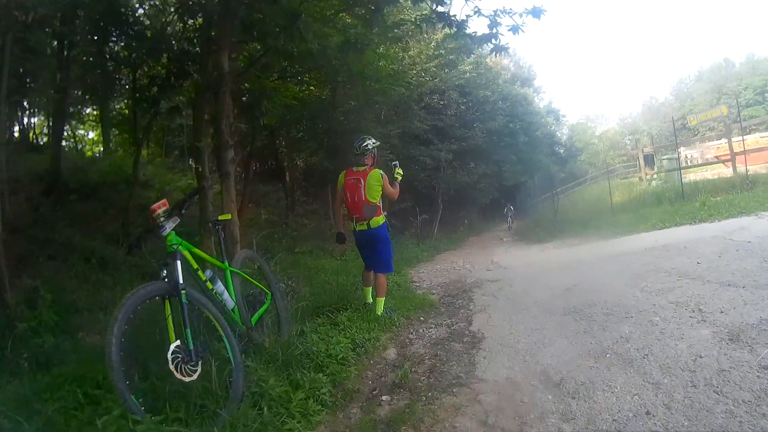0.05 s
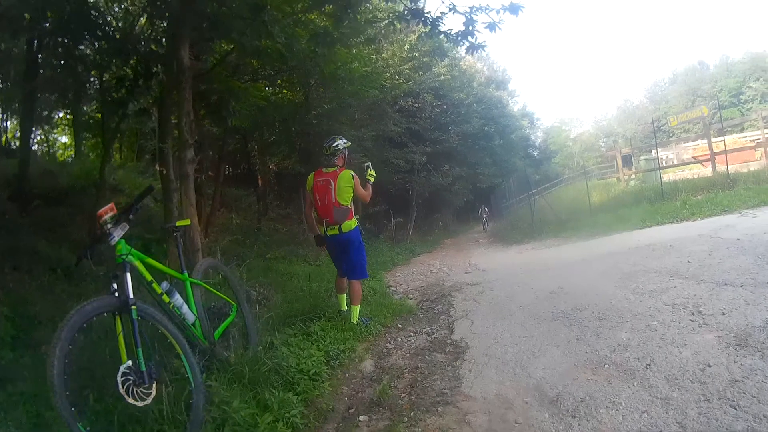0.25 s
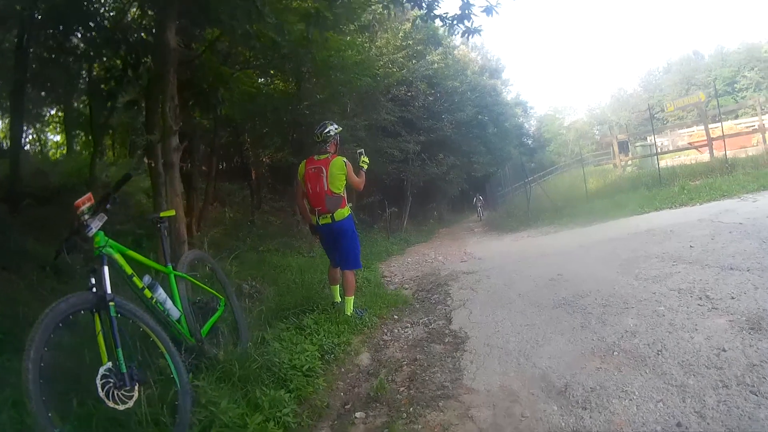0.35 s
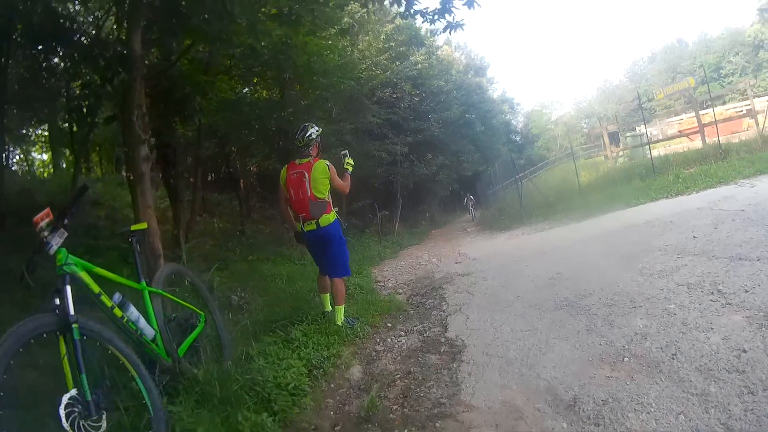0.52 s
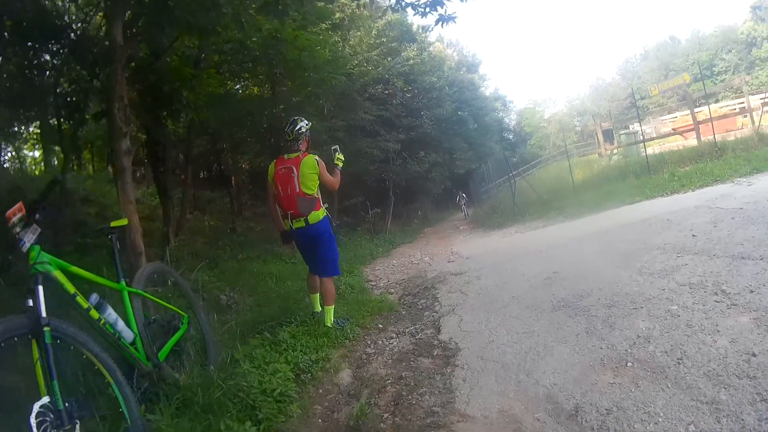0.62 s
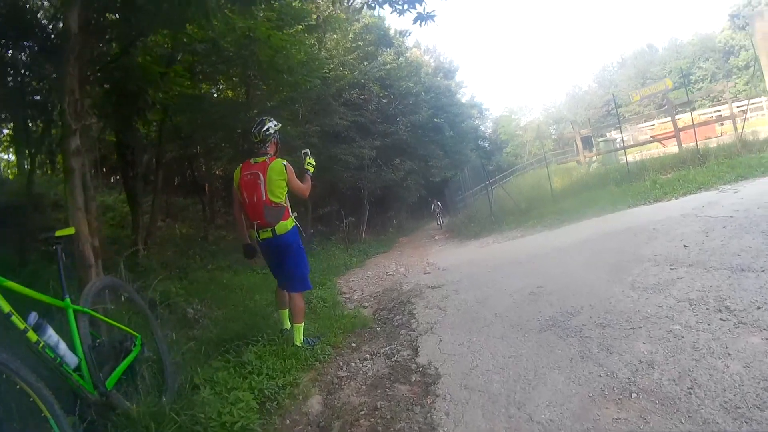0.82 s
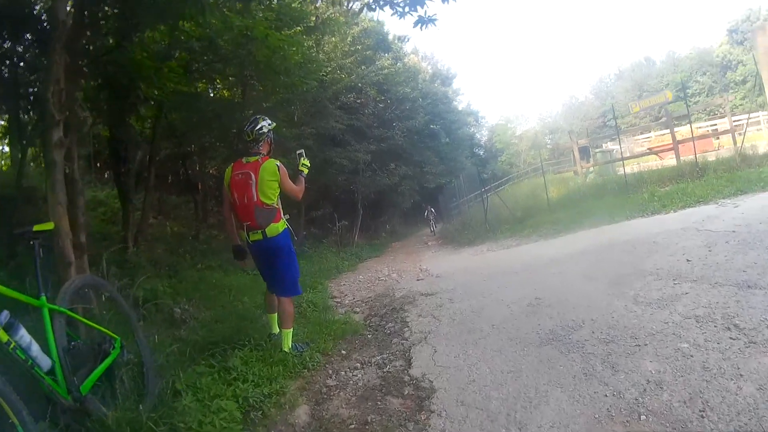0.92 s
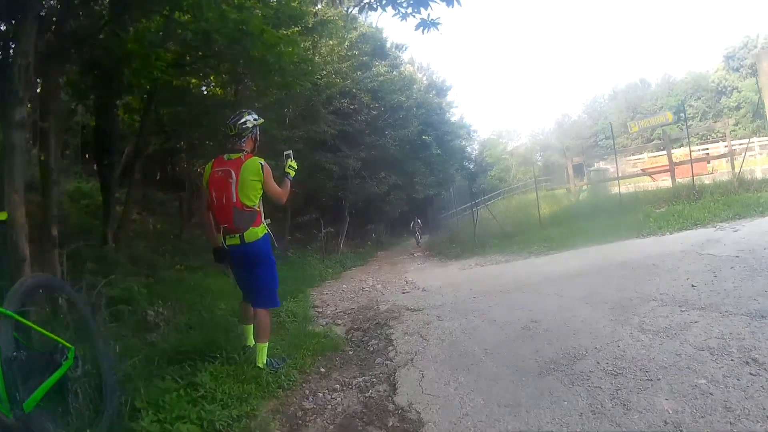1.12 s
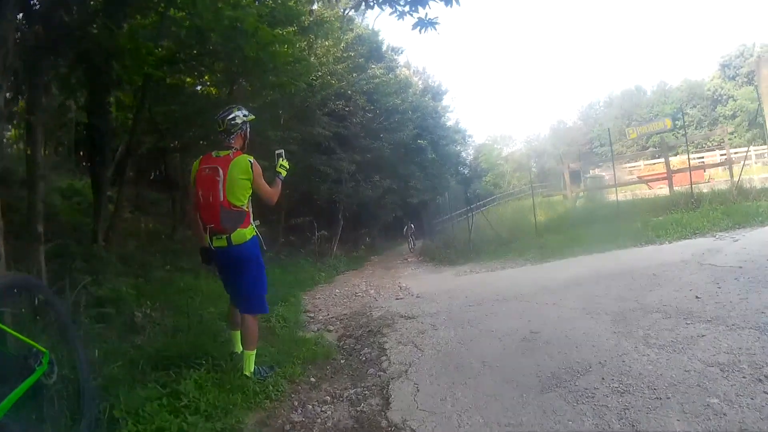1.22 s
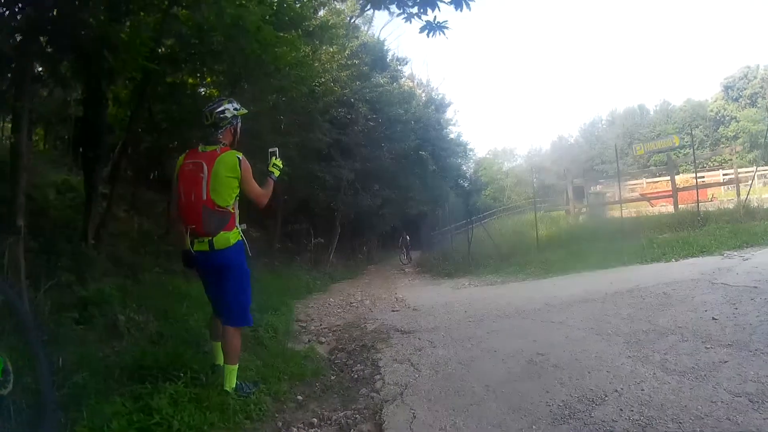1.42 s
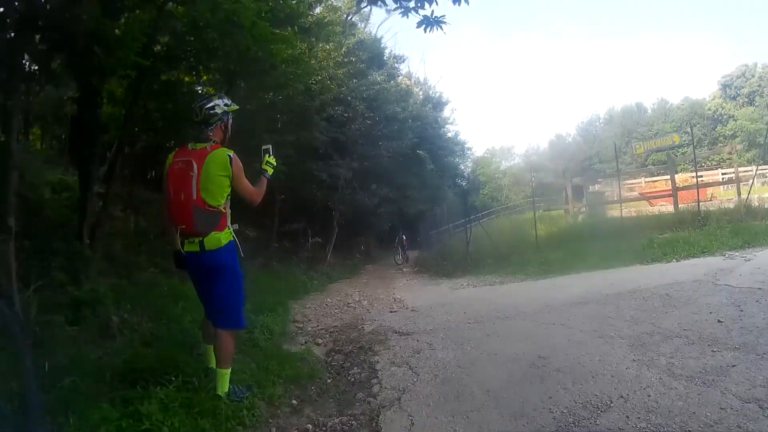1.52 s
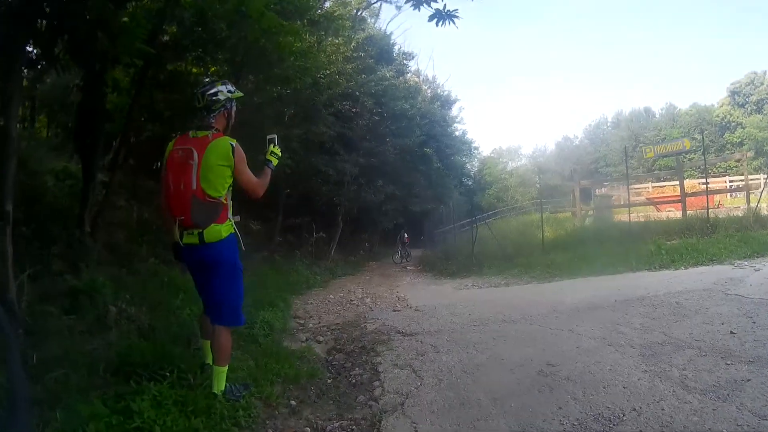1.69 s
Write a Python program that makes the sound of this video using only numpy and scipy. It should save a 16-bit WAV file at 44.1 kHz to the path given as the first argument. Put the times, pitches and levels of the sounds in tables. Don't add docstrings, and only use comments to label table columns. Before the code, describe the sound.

Close, rough bike-mounted sound of tyres on a gravel track: a dense flurry of jolts and stone cracks, ringing hits on the frame tube, then sparser grit snaps, one last thud cluster and faint hiss.

```python
import sys
import numpy as np
from scipy import signal
from scipy.fft import rfft, irfft
from scipy.io import wavfile
from scipy.ndimage import uniform_filter1d

SR = 44100
rng = np.random.default_rng(int(sys.argv[2]) if len(sys.argv) > 2 else 0)


def natural_amplitude(level_db):
    exponent = np.asarray(level_db, float) / 20
    return 10 ** exponent


def pcm_store(signal):
    levels = np.round(np.clip(np.atleast_2d(signal), -1, 1) * 32767)
    wavfile.write(sys.argv[1], SR, levels.astype(np.int16).T)


N = 77175


def read(points, hz):
    f, value = np.transpose(points)
    return np.interp(np.log(hz + 1), np.log(f + 1), value)


def curve(points):
    s, level_db = np.transpose(points)
    return natural_amplitude(np.interp(np.arange(N) / SR, s, level_db))


def evened(x):
    return x / np.sqrt(np.mean(x ** 2) + 1e-20)


def slow_noise(shape, size):
    noise = rng.standard_normal(shape)
    return evened(uniform_filter1d(uniform_filter1d(noise, size=size), size=size))


def add(mix, s, sound):
    part = mix[max(round(s * SR), 0):][:len(sound)]
    part += sound[:len(part)]


def resonate(x, hz, width):
    r, c = np.exp(-np.pi * width / SR), np.cos(2 * np.pi * hz / SR)
    return signal.lfilter([2 * (1 - r), -2 * (1 - r) * r * c], [1, -2 * r * c, r * r], x)


def body(x, table):
    total = 0
    for k, (hz, width, level_db) in enumerate(table):
        sign = (-1) ** k
        total = total + sign * natural_amplitude(level_db) * resonate(resonate(x, hz, 2 * width), hz, width)
    return total


# start_s [s], level_db [dB], pitch_hz [Hz], rattle_db [dB]
KNOCKS = [(0.0082, -44, 477, 13), (0.0694, -31, 250, -4), (0.1474, -14.5, 237, -4), (0.2073, -2.5, 620, -2),
          (0.2202, -18.5, 243, 0), (0.2283, 3.5, 570, -4.5), (0.2523, -8.5, 464, 0), (0.291, -16, 218, -6),
          (0.3028, -13, 400, -7), (0.3183, 3, 560, -5), (0.3522, 3.5, 550, -2.5), (0.3756, 0.5, 472, -12.5),
          (0.4092, -11, 570, 6.5), (0.43, -5, 510, -0.5), (0.447, -9.5, 223, -4.5),
          (0.4948, -17.5, 209, -8), (0.5464, -9.5, 520, 5.5), (0.553, -18, 187, -10),
          (0.587, -14.5, 225, -14), (0.7611, -19, 208, -18), (0.813, -23, 132, -7),
          (0.8556, -20.5, 194, -22), (1.0236, -12.5, 520, -10.5), (1.296, -31, 245, -2),
          (1.372, -4, 263, -9.5), (1.4057, -13, 490, -4.5), (1.4165, -7, 268, -15),
          (1.6635, -24.5, 483, -6), (1.6753, -37, 485, -3.5)]
# pitch_hz [Hz], width_hz [Hz], level_db [dB]
RATTLE = [(135, 106, 4), (520, 208, 5.5), (814, 310, -11.5), (1595, 780, -7.5)]


def knocks():
    t, mix, shake = np.arange(4000) / SR, np.zeros(N), np.zeros(N)
    noise = rng.standard_normal((len(KNOCKS), 4000))
    thump = natural_amplitude(-23.5) * np.sin(2 * np.pi * 91.2 * t) * np.exp(-t / 0.02)
    for (start_s, level_db, pitch_hz, rattle_db), rough in zip(KNOCKS, noise):
        cycles = t * pitch_hz
        rise = np.minimum(cycles / 0.623, 1) ** 3.2
        fade = np.exp(-np.maximum(cycles - 0.7, 0) / 0.67)
        push = np.sin(2 * np.pi * cycles) * rise * fade
        push_gain = natural_amplitude(2.5) * (pitch_hz / 500) ** 0.043
        add(mix, start_s - 0.5 / pitch_hz, natural_amplitude(level_db) * (push_gain * push + thump))
        add(shake, start_s, natural_amplitude(level_db + rattle_db) * rough * np.exp(-t / 0.0091))
    return natural_amplitude(-2.5) * mix + natural_amplitude(0.5) * body(shake, RATTLE)


# start_s [s], level_db [dB], upper note pitch_hz [Hz], lower note low_db [dB]
RINGS = [(0.051, -32.5, 1390, -3), (0.405, -3.5, 1320, -7.5), (0.444, -15.5, 1750, -15),
         (0.4585, -18, 1400, -5), (0.519, -15, 1360, -16), (0.529, -19.5, 1380, 1), (0.5365, 0, 1389, -3),
         (0.5577, -14.5, 1290, 6.5), (0.5939, -16.5, 1306, 2.5), (0.605, -22, 1283, -10),
         (0.6248, -22, 1355, 5.5), (0.6521, -22.5, 1325, -3), (0.6983, -23.5, 1350, -5),
         (0.784, -28, 1670, -17), (0.8118, -24, 1230, -15), (0.8389, -11, 1262, 2.5),
         (0.9072, -10.5, 1327, 4.5), (1.1275, -7.5, 1291, -15), (1.15, -35.5, 1170, 1),
         (1.405, -20, 1234, -3.5), (1.4493, -21, 1387, -15), (1.5125, -40.5, 1240, 5),
         (1.637, -37, 1710, -1), (1.6606, -22.5, 1335, -4), (1.7284, -22, 1247, -5)]
# pitch_hz [Hz], level_db [dB], time to fade by 60 dB t60_s [s]
TUBE = [(1758, -7, 0.02), (768, -15.5, 0.1), (570, -11.5, 0.072)]


def rings():
    t, mix = np.arange(4000) / SR, np.zeros(N)
    rise_s = 0.0042
    waver = slow_noise((len(RINGS), 4000), 90)
    rise = np.sin(np.pi / 2 * np.minimum(t / rise_s, 1)) ** 2
    fade_time = np.maximum(t - rise_s, 0)
    phases = rng.random((len(RINGS), 5))
    for (start_s, level_db, pitch_hz, low_db), phase, wobble in zip(RINGS, phases, waver):
        notes = [(pitch_hz, 0, 0.026), (1134, low_db, 0.04)] + list(TUBE)
        tone = 0
        for (hz, note_db, t60_s), p in zip(notes, phase):
            fade = natural_amplitude(note_db - 60 * fade_time / t60_s)
            tone = tone + fade * np.sin(2 * np.pi * (hz * t + p) + 0.45 * wobble)
        add(mix, start_s - 0.0015, natural_amplitude(level_db - 4.5) * rise * tone)
    return mix


def bursts(rows, decay_s, table, crumbs):
    t, mix = np.arange(1024) / SR, np.zeros(N)
    noise, chance = rng.standard_normal((len(rows), 1024, 2)).transpose(2, 0, 1)
    age = t / decay_s
    first_puff = age * np.exp(-2 * age)
    tail = np.minimum(age / 0.43, 1) * np.exp(-age / 2.09)
    rare = 1.0 * (chance > 2.7)
    scatter = crumbs * uniform_filter1d(rare, size=20) * np.exp(-t / 0.0045)
    puffs = noise * (first_puff + tail + scatter)
    for (start_s, level_db), sound in zip(rows, body(puffs, table)):
        loudest = np.sqrt(2 * uniform_filter1d(sound ** 2, size=60).max())
        add(mix, start_s, natural_amplitude(level_db) * sound / loudest)
    return mix


# start_s [s], level_db [dB]
CRACKS = [(.2065, -18), (.2172, -14.5), (.2283, -13.5), (.24, -15), (.2335, -35), (.247, -26),
          (.2539, -17.5), (.263, -28), (.2916, -27.5), (.295, -16.5), (.3015, -22), (.3173, -13.5),
          (.3228, -17.5), (.3405, -15), (.3521, -9.5), (.365, -12), (.3765, -10), (.4305, -24),
          (.4447, -13), (.456, -23), (.4365, -46), (.5398, -18), (.592, -45), (.7713, -38.5),
          (.9853, -44.5), (1.0233, -30.5), (1.2896, -35.5), (1.3766, -23.5), (1.402, -37), (1.4164, -28),
          (1.4428, -34)]
# pitch_hz [Hz], width_hz [Hz], level_db [dB]
STONE = [(1576, 720, 13.5), (2130, 1060, 3.5), (2900, 890, 3.5), (4140, 860, -1.5), (5130, 770, -2),
         (14000, 1700, -40)]


def cracks():
    return natural_amplitude(0.5) * bursts(CRACKS, 0.0011, STONE, 5.3)


# start_s [s], level_db [dB]
SNAPS_ROLL = [(0.006, -34), (0.0147, -36.5), (0.0231, -49), (0.0315, -40.5), (0.0493, -45), (0.0558, -42),
              (0.1524, -58), (0.1596, -29.5), (0.1651, -39.5), (0.2052, -32), (0.2102, -34),
              (0.2173, -23.5), (0.2216, -38), (0.2284, -36), (0.2332, -30), (0.2395, -33), (0.2465, -39),
              (0.2496, -31), (0.2585, -45), (0.2541, -24.5), (0.2633, -40), (0.2692, -36), (0.2844, -43),
              (0.2925, -49), (0.295, -22.5), (0.2985, -38), (0.3015, -29), (0.3175, -38), (0.3198, -23.5),
              (0.3232, -32), (0.3268, -58), (0.3405, -42), (0.3469, -36), (0.3546, -24), (0.367, -23.5),
              (0.3777, -21.5), (0.383, -62)]
# start_s [s], level_db [dB]
SNAPS_BRAKING = [(0.4084, -55), (0.4159, -59), (0.4304, -49), (0.4395, -40), (0.4449, -51), (0.4525, -43),
                 (0.4563, -46), (0.4622, -33.5), (0.4689, -38), (0.4809, -36), (0.488, -36), (0.4953, -40),
                 (0.5012, -33), (0.506, -35), (0.5403, -27.5), (0.5446, -28), (0.593, -36.5), (0.6432, -42),
                 (0.6536, -45), (0.6579, -41), (0.6656, -43.5), (0.7372, -43.5), (0.7716, -28),
                 (0.8246, -42.5), (0.8385, -48), (0.845, -40), (0.8515, -49), (0.858, -48), (0.8777, -39),
                 (0.8873, -40)]
# start_s [s], level_db [dB]
SNAPS_CRAWL = [(1.005, -50), (1.0115, -53), (1.0159, -52), (1.0195, -54), (1.0235, -57), (1.033, -34),
               (1.038, -50), (1.0811, -54), (1.091, -46.5), (1.1203, -40.5), (1.1255, -40), (1.1306, -49),
               (1.1468, -43), (1.1822, -32.5), (1.2273, -40.5), (1.234, -50), (1.246, -62), (1.2595, -42.5),
               (1.2903, -37), (1.3385, -44.5), (1.372, -32.5), (1.3766, -26), (1.3844, -34), (1.416, -33.5),
               (1.4209, -36), (1.4316, -36), (1.4428, -34), (1.4469, -35.5), (1.461, -45), (1.4672, -41)]
# pitch_hz [Hz], width_hz [Hz], level_db [dB]
HOUSING = [(2350, 560, 4.5), (4100, 370, 6.5), (5500, 880, 0.5), (7720, 1600, -7), (11030, 2300, -9.5),
           (13300, 1100, -36)]


def snaps():
    rows = list(SNAPS_ROLL) + list(SNAPS_BRAKING) + list(SNAPS_CRAWL)
    return natural_amplitude(-1) * bursts(rows, 0.00061, HOUSING, 11.0)


# start_s [s], level_db [dB]
PINGS = [(.1405, -34), (.406, -24), (.678, -48), (.8385, -34), (.9065, -34.5), (1.1275, -29.5),
         (1.268, -42.5), (1.5125, -45), (1.711, -50.5), (1.728, -41)]


def pings():
    return bursts(PINGS, 0.0027, [(2943, 370, 9), (4010, 520, -6.5)], 0)


def grains(per_s, spread_db):
    side, size, chance = rng.random((N, 3)).T
    strength = natural_amplitude(-spread_db * np.log(size + 0.03))
    return np.sign(side - 0.5) * strength * (chance < per_s / SR)


# start_s [s], level_db [dB]
ROLL = [(0, -33), (.11, -43), (.19, -36.5), (.39, -31), (.46, -31.5), (.56, -26), (.66, -34.5), (.8, -37),
        (1.2, -42), (1.33, -44.5), (1.42, -29), (1.49, -46), (1.62, -55.5), (1.66, -41.5), (1.75, -45.5)]
# start_s [s], level_db [dB]
SCUFF = [(0.0, -42), (0.042, -56), (0.16, -67), (0.218, -53), (0.346, -55), (0.404, -52.5), (0.584, -49.5),
         (0.822, -58), (1.32, -58), (1.472, -66), (1.75, -77)]
# start_s [s], level_db [dB]
BOUNCE = [(0.0, -39), (0.048, -36), (0.13, -51), (0.208, -28.5), (0.364, -25.5), (0.424, -37),
          (0.564, -29.5), (0.58, -45), (0.648, -30.5), (0.73, -53), (0.774, -35.5), (0.896, -54),
          (1.022, -42.5), (1.232, -52.5), (1.412, -27), (1.628, -58), (1.686, -39.5), (1.75, -50)]
# start_s [s], level_db [dB]
SHUDDER = [(0.0, -42), (0.058, -64), (0.106, -37), (0.174, -56), (0.214, -30), (0.554, -38), (0.58, -55),
           (0.832, -43), (0.852, -62), (1.09, -43), (1.266, -54.5), (1.368, -35.5), (1.49, -64),
           (1.75, -46)]
# pitch_hz [Hz], width_hz [Hz], level_db [dB]
FRAME = [(178, 196, -1.5), (550, 117, 6), (795, 49, -4), (1152, 185, -1.5), (1370, 168, -6.5),
         (1740, 335, -11.5), (2940, 340, -19.5), (3950, 510, -26)]


def rolling():
    clumps = natural_amplitude(2.65 * slow_noise((2, N), 500))
    crunch = evened(body(grains(1300, 2.4), FRAME[:6]) * clumps[0])
    sand = evened(body(grains(1300, 4.5), FRAME[6:]) * clumps[1] ** 2)
    grit = evened(body(grains(440, 4.5), list(HOUSING) + list(STONE)))
    bounce_hz = 88.0 + 6.13 * slow_noise(N, 900)
    bounce = np.sqrt(2) * np.sin(2 * np.pi * np.cumsum(bounce_hz) / SR)
    shudder = evened(body(rng.standard_normal(N), [(44.4, 26, 0)]))
    rolled = curve(ROLL) * (natural_amplitude(1) * crunch + natural_amplitude(-36) * grit)
    rolled += natural_amplitude(-4.0) * curve(SCUFF) * sand
    rolled += natural_amplitude(-0.5) * curve(BOUNCE) * bounce
    return rolled + natural_amplitude(2.5) * curve(SHUDDER) * shudder


# pitch_hz [Hz], level_db [dB per Hz]
HISS = [(2000, 2), (10000, -2.5), (15500, -3)]


def hiss():
    whine = natural_amplitude(-83) * np.sin(2 * np.pi * 9550 * np.arange(N) / SR)
    spectrum = rfft(rng.standard_normal(N))
    colour = natural_amplitude(read(HISS, np.fft.rfftfreq(N, 1 / SR)))
    return whine + natural_amplitude(-68.5) * evened(irfft(spectrum * colour, N))


def scene():
    mix = snaps() + cracks() + pings() + knocks() + rings() + rolling() + hiss()
    return mix[None]


def roll_off(x):
    return signal.sosfilt(signal.butter(12, 15830, fs=SR, output="sos"), x)


def record(dry):
    ceiling, edge_hz = 0.72, 15900
    clipped = np.clip(dry, -ceiling, ceiling)
    lowpass = signal.firwin(511, edge_hz, window=("kaiser", 9), fs=SR)
    mix = signal.oaconvolve(clipped, lowpass[None], "same")
    return roll_off(mix)


dry = scene()
out = record(dry)
pcm_store(out)
```